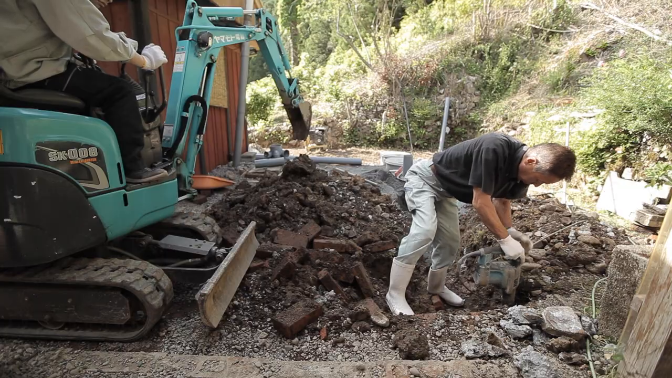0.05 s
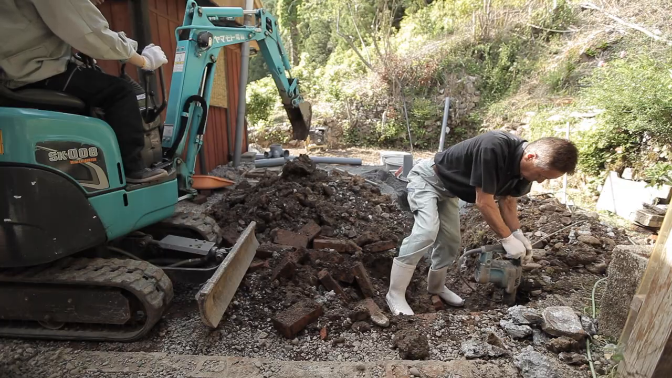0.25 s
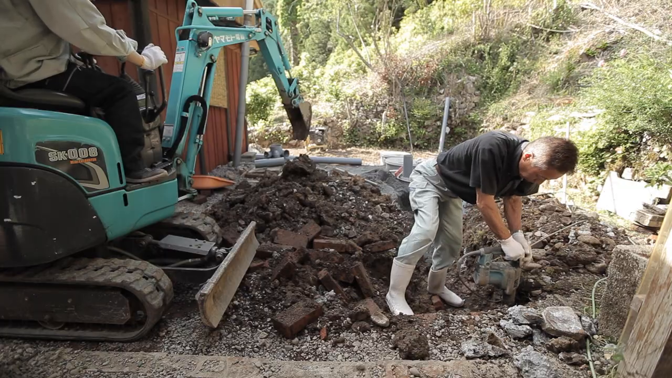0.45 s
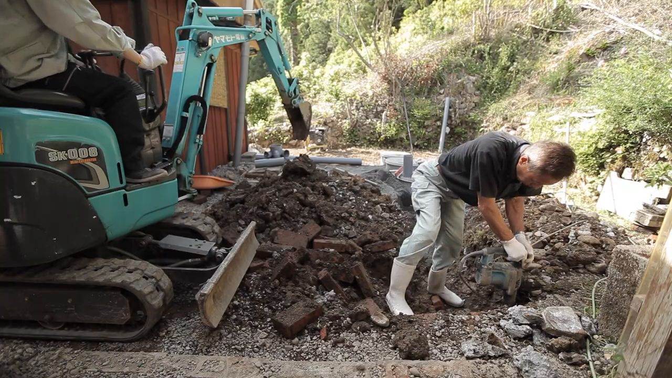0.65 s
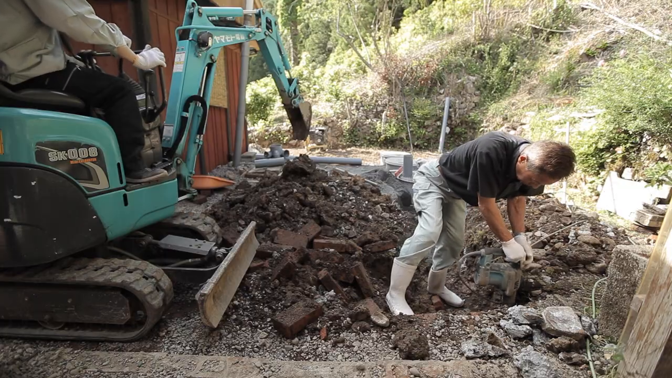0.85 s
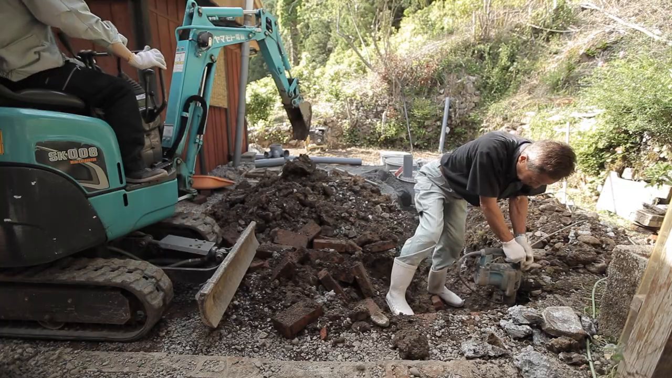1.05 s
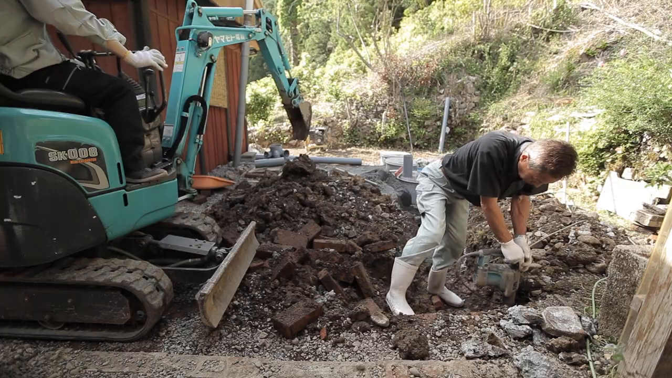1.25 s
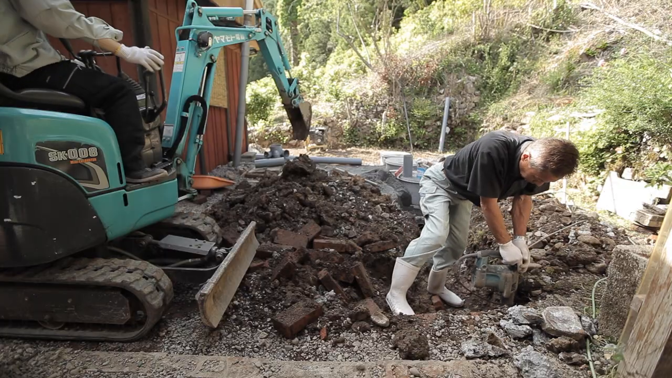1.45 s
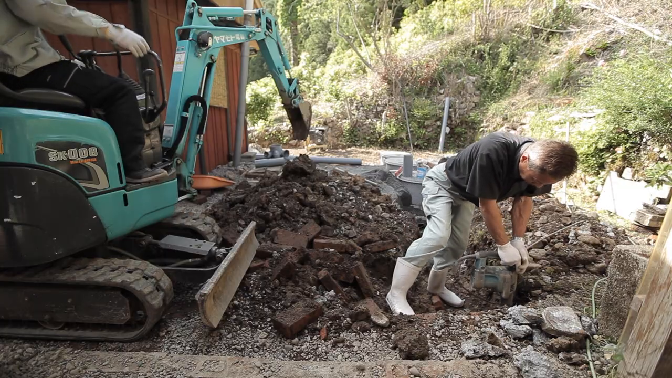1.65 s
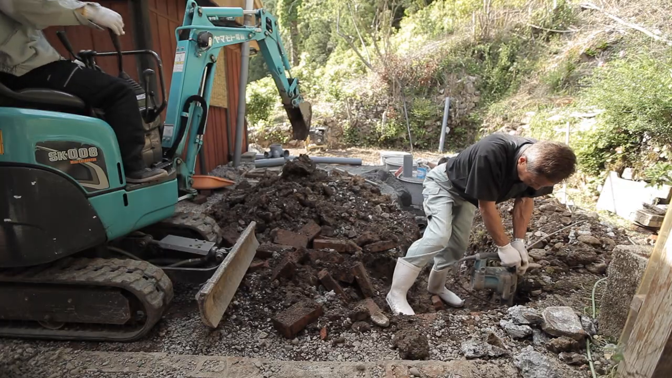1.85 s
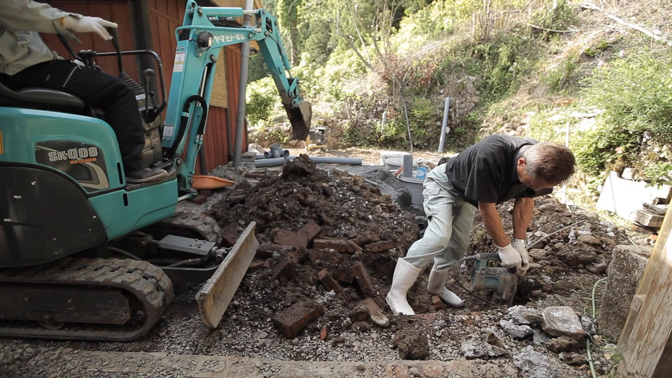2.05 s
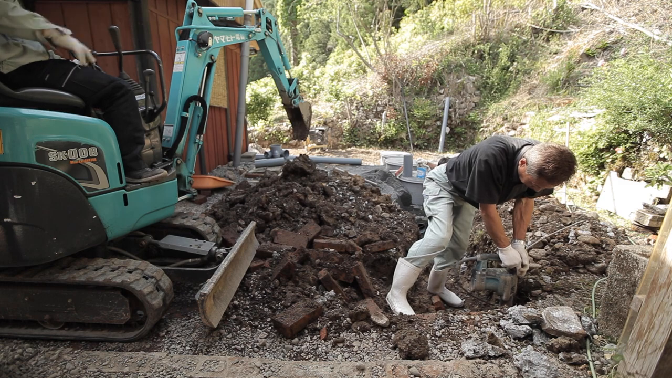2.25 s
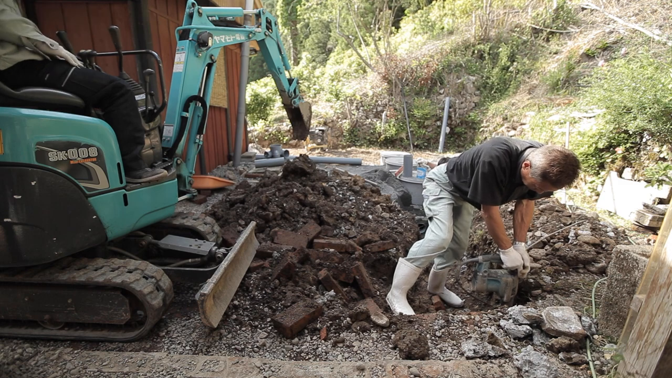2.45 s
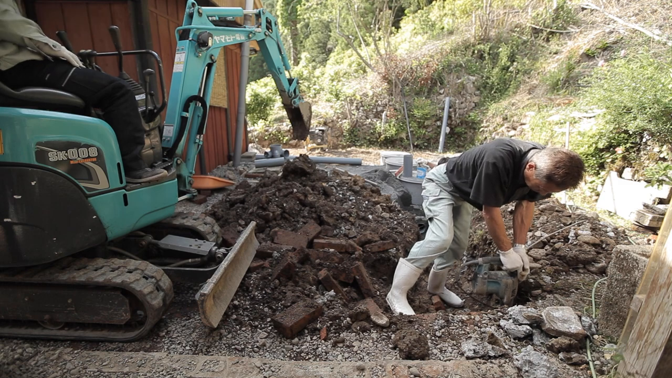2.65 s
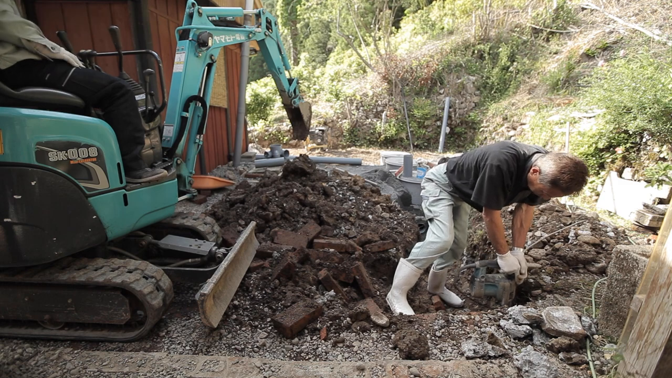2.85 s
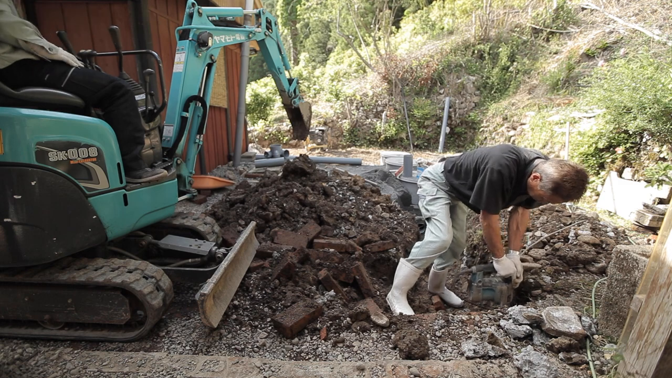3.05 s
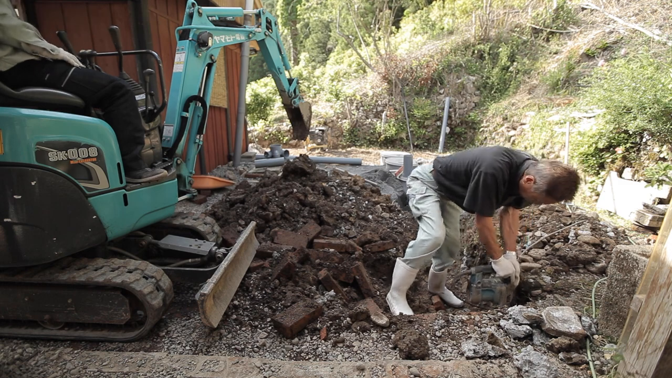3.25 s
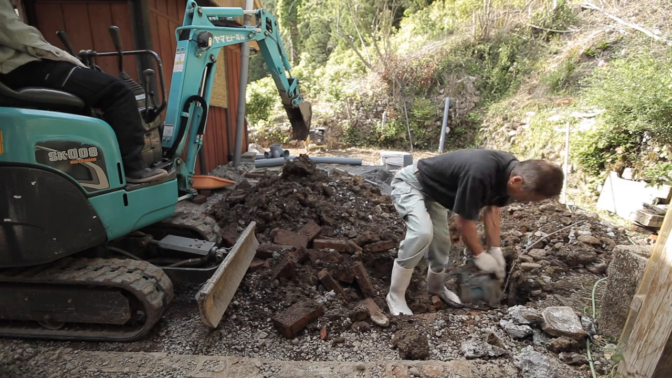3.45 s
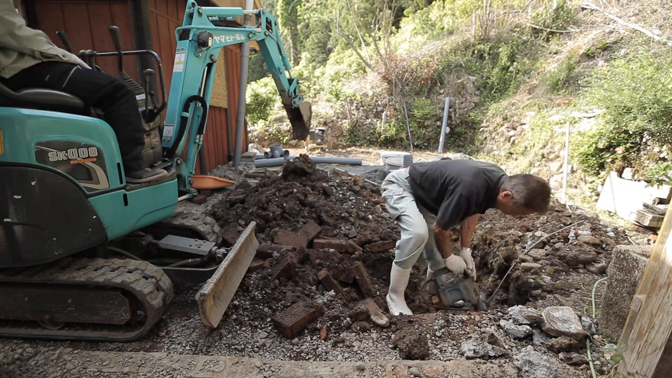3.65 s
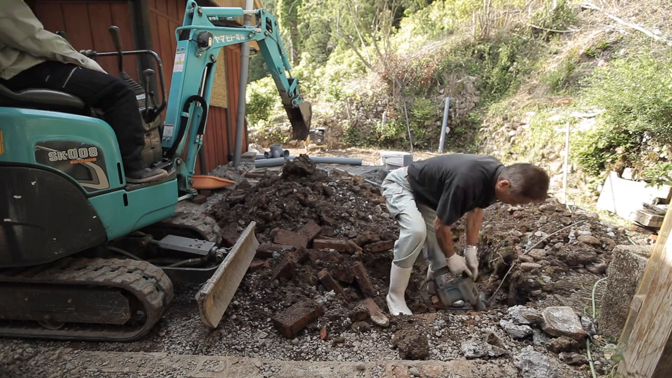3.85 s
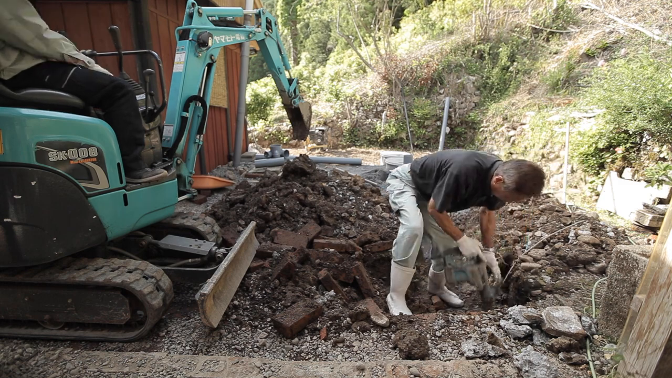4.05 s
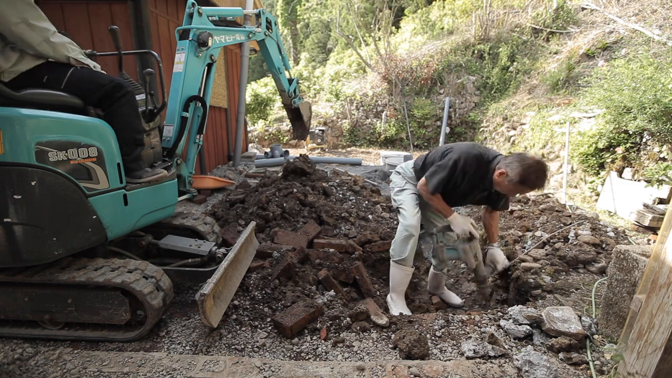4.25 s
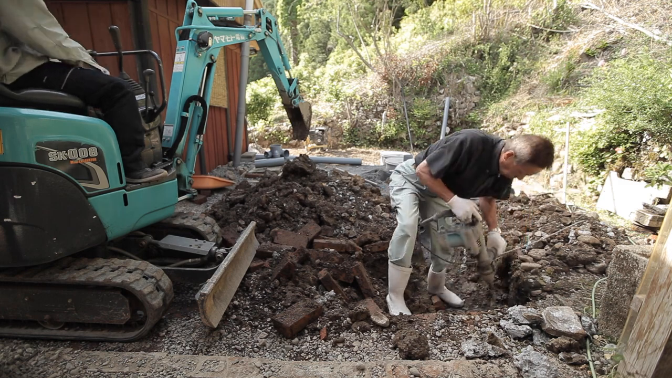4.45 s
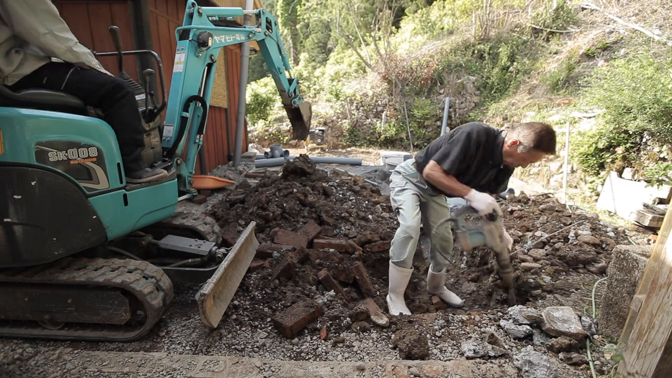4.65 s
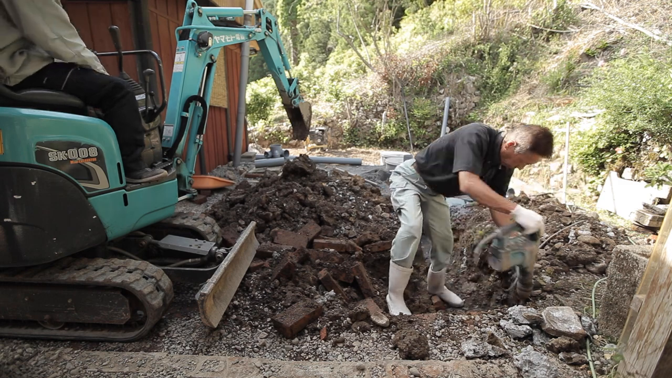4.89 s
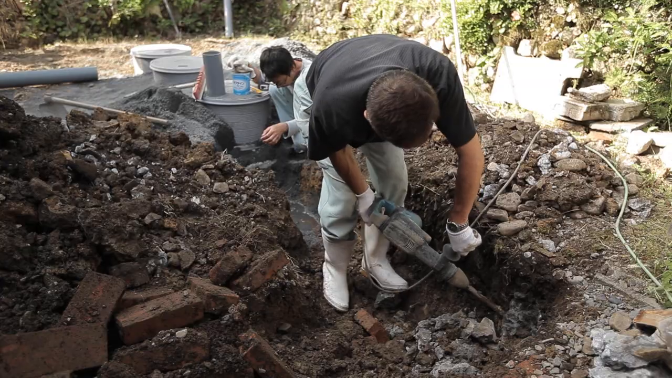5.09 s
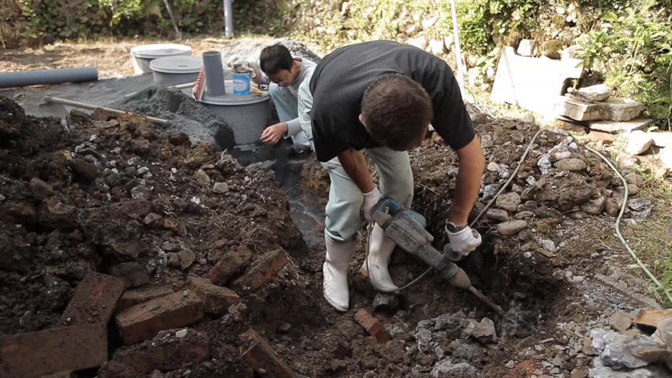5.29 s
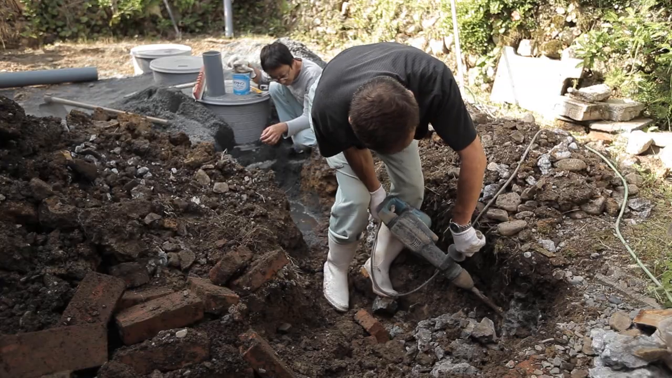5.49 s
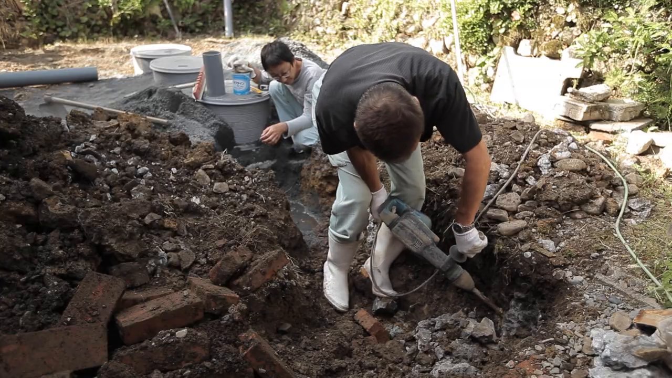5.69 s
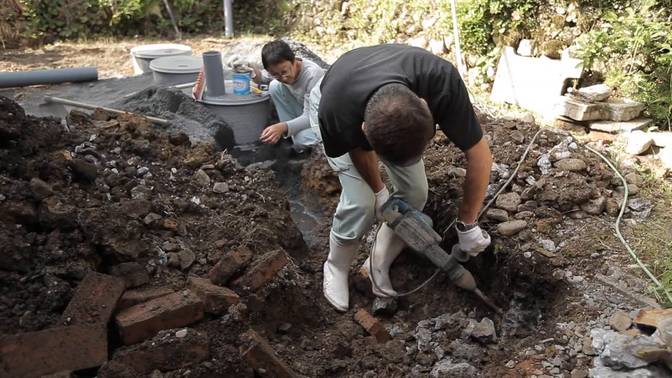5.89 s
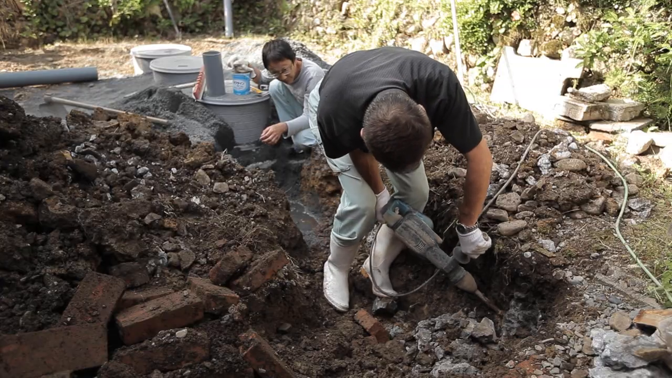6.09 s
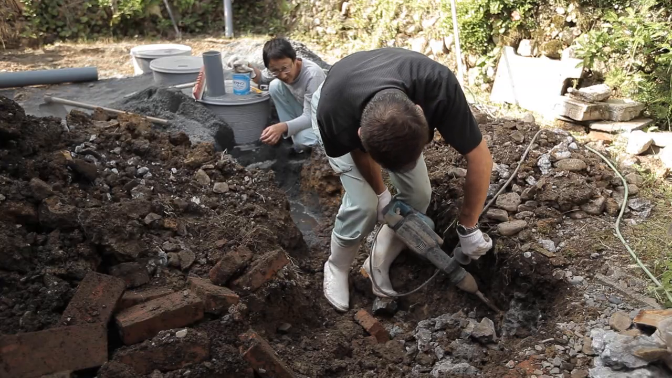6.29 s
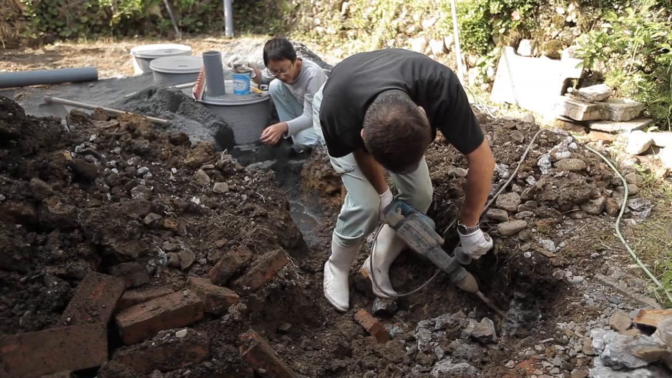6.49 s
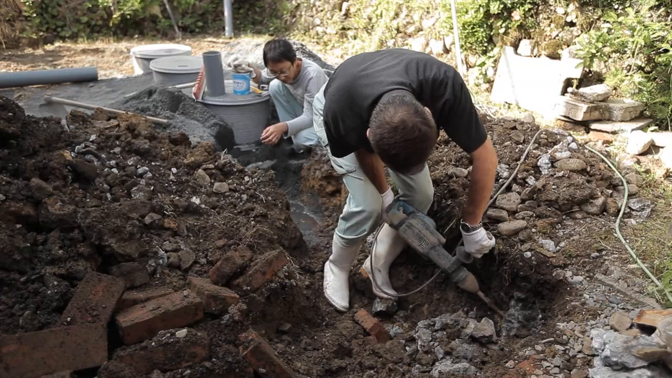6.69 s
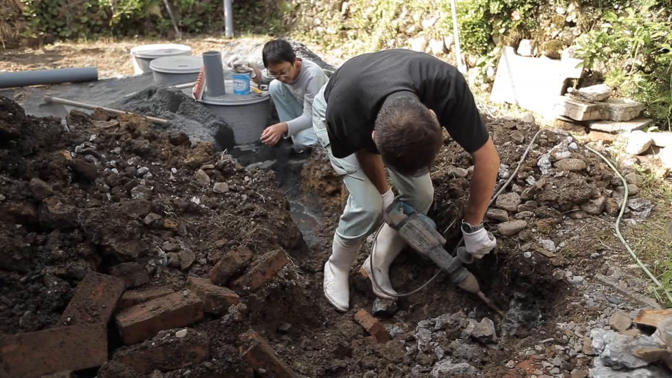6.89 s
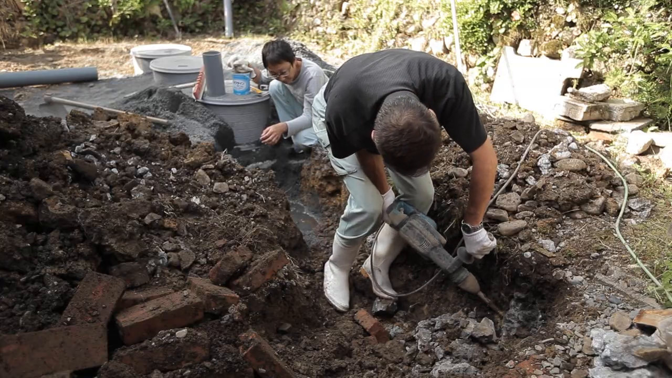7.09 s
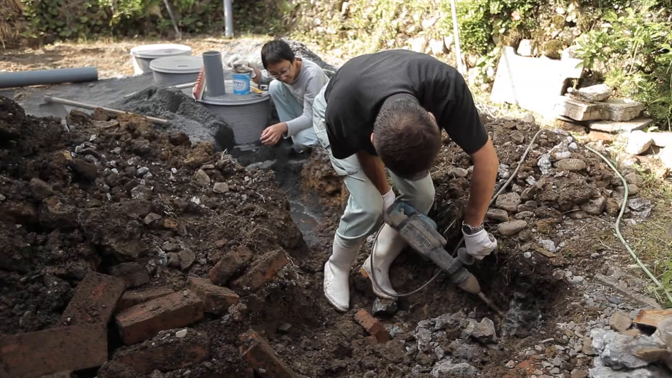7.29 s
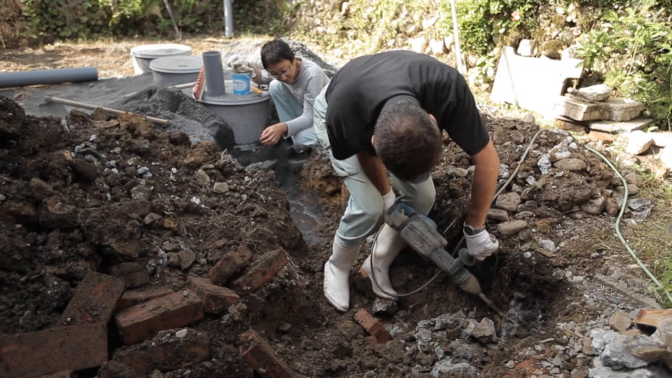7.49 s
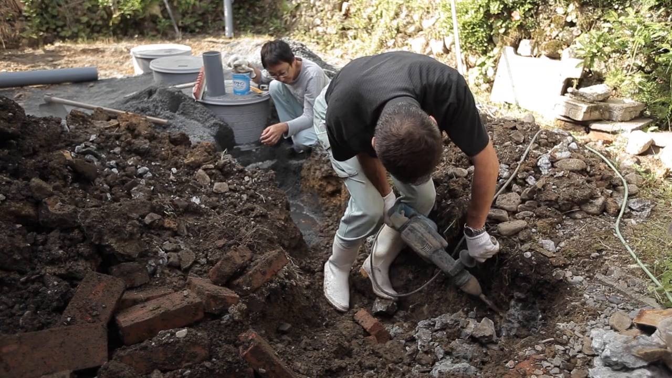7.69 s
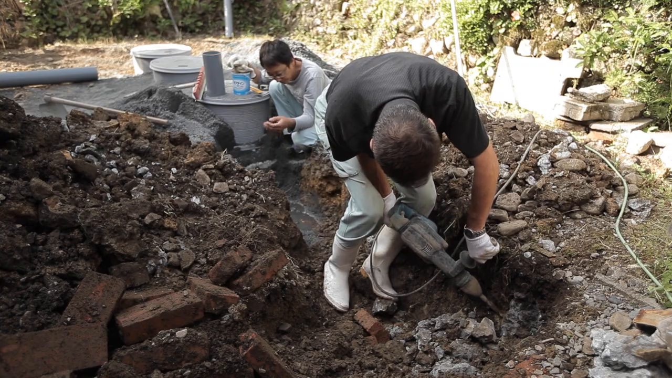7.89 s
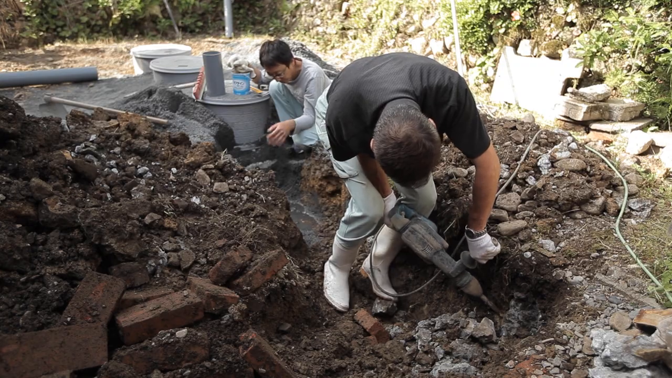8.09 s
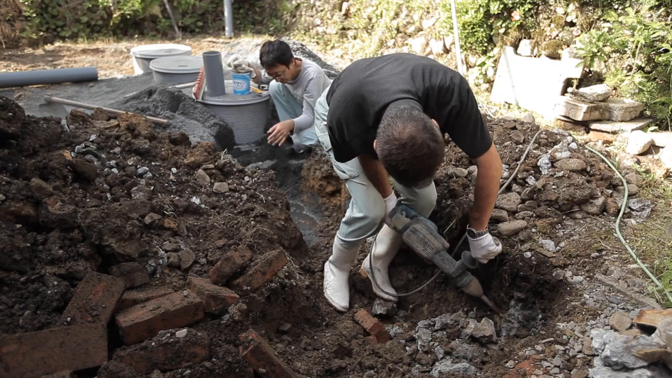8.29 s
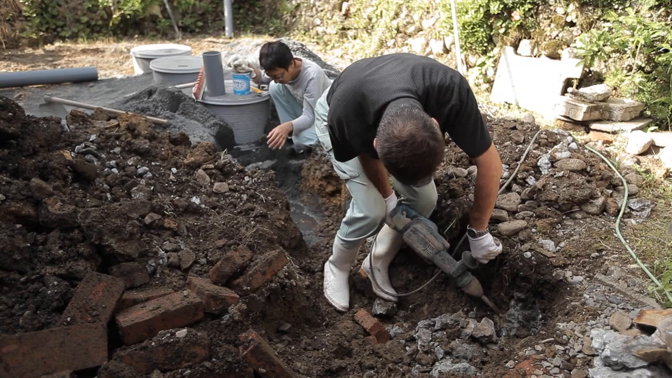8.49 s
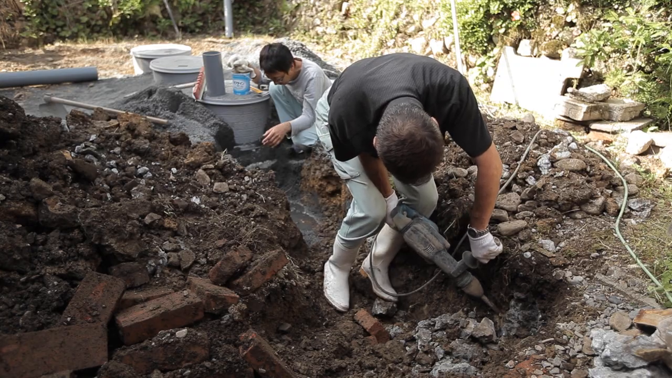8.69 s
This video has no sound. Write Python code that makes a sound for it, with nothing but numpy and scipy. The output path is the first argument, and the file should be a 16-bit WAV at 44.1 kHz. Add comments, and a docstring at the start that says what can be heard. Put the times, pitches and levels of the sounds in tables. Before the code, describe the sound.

An electric demolition hammer pounds packed, stony soil outdoors, heard from the side as very rapid thuds with cracking grit and a motor whine. It drops to a rattling idle for over a second, then jabs once. Now close in front, it taps lightly and resumes hammering on stone, brighter, with a ringing steel chisel. The blows overload the microphone and sound slightly distorted.

```python
"""Demolition hammer on stony ground

Outdoors, an electric hammer heard first from the side, then from close in front. On every crank turn
the gears whine as the piston compresses, then the blow lands: the ground thuds, grit cracks, the chisel
rings. In between, the tool is lifted and rattles idle. The blows overload the microphone, which clips."""
import sys
import numpy as np
from scipy import signal
from scipy.fft import rfft, irfft, next_fast_len
from scipy.io import wavfile

SR = 44100
rng = np.random.default_rng(int(sys.argv[2]) if len(sys.argv) > 2 else 0)


def wav_out(sig):
    """Save sig, one row per channel (or a flat mono array), as 16-bit PCM at SR to the path in sys.argv[1]."""
    wavfile.write(sys.argv[1], SR, np.round(np.clip(np.atleast_2d(sig).T, -1, 1) * 32767).astype(np.int16))


N = 385434
FRONT_FROM_S = 5.015  # the microphone position changes here

# The chisel is pressed into soil, jabbed once, then set on stone.
# Each row: start and end in seconds, load from 0 to 1, rattle in dB, ring over crack in dB.
PRESSES = [(-.1, 3.56, 0.69, -30.5, -4.5), (4.8, 5.0, 0.38, -25, 4.5), (5.331, 8.8, 1, -31.5, 2)]
# Spectrum of splitting stone. Each row: frequency in Hz, relative density in dB.
CRACK_SPECTRUM = [(80, -7), (250, -7), (600, 1), (1000, 1.5), (2400, 3.5), (4000, -1), (6000, 1.5),
                  (7800, -0.5), (9800, 1), (11000, -8), (15500, -7.5)]


def gain_of(db):
    """Decibels to a factor."""
    return 10 ** (np.asarray(db) / 20)


def unit_rms(x):
    """Scales to rms 1."""
    return x / np.sqrt(np.mean(x ** 2) + 1e-20)


def follow(rows, t):
    """The columns of a curve table at the times t."""
    times, *columns = np.transpose(rows)
    return [np.interp(t, times, column) for column in columns]


def add(mix, start_s, sound):
    """Mixes a sound in at start_s."""
    part = mix[max(round(start_s * SR), 0):][:len(sound)]
    part += sound[:len(part)]


def noise(spectrum, size, ripple_db=0):
    """Noise of rms 1 with the given spectrum, rippled by many small resonances."""
    n = next_fast_len(size)
    hz, db = np.transpose(spectrum)
    bins = np.fft.rfftfreq(n, 1 / SR)
    knots = np.geomspace(900, SR / 2, 150)
    ripple = ripple_db * np.interp(bins, knots, np.tanh(rng.standard_normal(len(knots))), left=0)
    shape_db = np.interp(np.log(bins + 1), np.log(hz), db) + ripple
    return unit_rms(irfft(rfft(rng.standard_normal(n)) * gain_of(shape_db), n)[:size])


def drift(t, per_s):
    """Random values, per_s of them a second, joined by lines."""
    knots = np.arange(0, N / SR + 1, 1 / per_s)
    return np.interp(t, knots, rng.standard_normal(len(knots)))


def per_turn(turns, spread_db):
    """A random gain that holds for one crank turn."""
    return gain_of(spread_db * rng.standard_normal(size=512))[turns.astype(int)]


def swell(turns, at, width):
    """A smooth bump once a turn; place and width in turns."""
    return np.exp((np.cos(2 * np.pi * (turns - at)) - 1) / (2 * np.pi * width) ** 2)


def burst(turns, rise, decay):
    """A sharp rise and a decay once a turn; both in turns."""
    since = turns % 1
    return unit_rms((1 - np.exp(-since / rise)) * np.exp(-since / decay))


def crank(t, speed, start):
    """Crank turns counted from start, very slightly uneven."""
    turns = start + np.cumsum(follow(speed, t)[0]) / SR
    return turns + 0.0015 * drift(t, per_s=40) + 0.003 * drift(t, per_s=7)


def contact(t, start, end, release_s, bite_s=0.056):
    """How firmly the chisel meets the ground, 0-1: a quick bite, a hold, a release."""
    return np.clip((t - start) / bite_s, 0, 1) * np.exp(-np.maximum(t - end, 0) / release_s)


def pressing(t, presses, ground):
    """Each press takes the load and the levels of thud, crack, ring and rattle from idle to work."""
    ground_db, stone_db = follow(ground, t)
    idle = 0.26, -56, -58, -63, -32
    idle_load, idle_thud, idle_crack, idle_ring, idle_rattle = idle
    load, thud_db, crack_db, ring_db, rattle_db = idle
    for start, end, full_load, clatter_db, steel_db in presses:
        firm = contact(t, start, end, release_s=0.018)
        jingle = contact(t, start, end, release_s=0.23)  # the freed chisel jingles on
        load += firm * (full_load - idle_load)
        thud_db += firm * (ground_db - idle_thud)
        crack_db += firm * (stone_db - idle_crack)
        rattle_db += firm * (clatter_db - idle_rattle)
        ring_db += jingle * (stone_db + steel_db - idle_ring)
    return np.clip(load, 0, 1), thud_db, crack_db, ring_db, rattle_db


def whine(t, turns, load, order, swing, at, width, back, kick, steady, flutter, overtone):
    """A tone of order cycles a turn that swells and rises on compression and is kicked by the blow."""
    slack = 1 - load  # near idle the tone wavers and the return stroke sounds too
    swung = turns + swing * load * np.sin(2 * np.pi * (turns - at - 0.08)) / (2 * np.pi)
    phase = 2 * np.pi * order * swung + flutter * drift(t, per_s=220)
    phase += slack ** 2 * (0.9 * drift(t, per_s=300) + 2.2 * drift(t, per_s=30))
    strokes = steady + swell(turns, at, width) + back * slack * swell(turns, at + 0.41, width)
    strokes += kick * load * swell(turns, at=0.078, width=0.04)
    strokes *= gain_of(4.5 * slack ** 2 * drift(t, per_s=14))
    tone = np.cos(phase) + overtone * load * np.cos(2 * phase)
    return unit_rms(strokes * per_turn(turns + 0.5, spread_db=0.86)) * tone


def motor(t, gears, fan):
    """Mixes both whines; the gears falter as the motor coasts and grow as the chisel is leaned on."""
    # Gear whine and fan whine. Each row: time in seconds, gain in dB.
    gear_gain = [(0, -28.5), (2, -30), (3, -31.5), (3.5, -32.5), (3.65, -38.5), (3.85, -34.5), (4, -43),
                 (4.15, -36.5), (4.65, -35), (4.85, -39), (4.98, -29), (5.03, -44), (5.3, -44),
                 (5.55, -33.5), (6.3, -30.5), (7.05, -29.5), (7.3, -30), (7.7, -28), (8.3, -27), (8.7, -28)]
    fan_gain = [(0, -37.5), (1.4, -35.5), (2.1, -33.5), (3.5, -31), (3.7, -36.5), (3.79, -41), (3.9, -35),
                (4.05, -44), (4.12, -33), (4.2, -38), (4.3, -32), (4.7, -31.5), (4.82, -37), (4.95, -35),
                (5.03, -40), (5.2, -33.5), (5.75, -31.5), (5.95, -39.5), (7.8, -37), (8.4, -34)]
    return gain_of(follow(gear_gain, t)[0]) * gears + gain_of(follow(fan_gain, t)[0]) * fan


def rattle(turns, load):
    """Piston and gear case clatter twice a turn; under load the clatter evens out towards a rush."""
    # Spectrum of the clatter. Each row: frequency in Hz, relative density in dB.
    spectrum = [(60, -48), (170, -48), (210, -8), (250, -17), (400, -9), (520, -0.5), (600, -0.5), (780, 3),
                (1500, 2), (2700, -3), (4000, -0.5), (5300, -2), (6500, -6.5), (9000, -8.5), (11000, -23),
                (15500, -27)]
    strokes = 1.24 + 0.66 * load + swell(turns, at=0.87, width=0.091)
    strokes += 1.6 * swell(turns, at=0.22, width=0.098)
    envelope = unit_rms(strokes * per_turn(turns + 0.5, spread_db=1))
    return envelope * noise(spectrum, len(turns), ripple_db=4.5)


def chisel(times, size, strengths):
    """Every blow rings the steel; the changing grip of the ground detunes and favours single modes."""
    # Modes of the steel. Each row: frequency in Hz, relative level in dB, seconds to fall 60 dB.
    modes = [(5505, -5.5, 0.03), (5650, -2, 0.028), (5830, -8, 0.026), (7540, -24, 0.041),
             (8640, -3, 0.044), (8700, 1, 0.036), (8940, 1, 0.037), (9400, -4, 0.033), (9860, -11.5, 0.073),
             (12430, 0.5, 0.021), (12100, -9, 0.03)]
    hz, db, t60 = np.transpose(modes)[:, :, None]
    t, out = np.arange(SR // 32) / SR, np.zeros(size)
    grips_db = 2.8 * np.transpose([drift(times, per_s=5) for _ in modes])
    chance = rng.standard_normal((len(times), 3, len(modes), 1))
    dying = gain_of(db - 60 * t / t60) * (1 - np.exp(-t / 0.00026))
    bends = 1 + 0.005 * drift(times, per_s=6)
    scatter_hz = 3 / t60  # the modes damped most by the ground are also detuned most
    for start, strength, grip, bend, draws in zip(times, strengths, grips_db, bends, chance):
        detune, accent, phase = draws
        waves = np.sin(2 * np.pi * (hz * bend + scatter_hz * detune) * t + 1.13 * phase)
        gains = gain_of(grip[:, None] + 3.1 * accent)
        add(out, start, strength * (gains * dying * waves).sum(0))
    return out


def ring(t, turns):
    """The chisel is struck once a turn and rebounds against its holder a moment later."""
    times = t[1:][np.diff(np.floor(turns)) > 0] - t[0]
    rebound_s = 0.0048 + 0.0012 * rng.standard_normal(len(times))
    full = np.ones(len(times))
    return unit_rms(chisel(times, len(t), full) + chisel(times + rebound_s, len(t), 0.49 * full))


def cushioned(x, ring_db, top_hz, soft_db=-38, span_db=8):
    """Soil softens the blow, so the highest modes of the steel sound only when it rings hard on stone."""
    soft = signal.sosfiltfilt(signal.butter(4, top_hz, fs=SR, output="sos"), x)
    return soft + np.clip((ring_db - soft_db) / span_db, 0, 1) * (x - soft)


def stray_blows():
    """Single light blows while the chisel barely touches: a ring and a short snap."""
    # Each row: start of a blow in seconds, relative strength in dB.
    blows = [(5.029, -31), (5.0769, -30), (5.1253, -24), (5.1504, -20), (5.224, -28), (5.296, -25),
             (5.3405, -17)]
    times, db = np.transpose(blows)
    out = gain_of(-9) * chisel(times, N, gain_of(db))
    t = np.arange(SR // 50) / SR
    for start, strength in zip(times, gain_of(db)):
        add(out, start, 0.29 * strength * np.exp(-t / 0.0017) * noise(CRACK_SPECTRUM, len(t)))
    return out


def crack(turns, decay, crumble):
    """Stone splits at the blow; then grit crumbles in clumps as the tip sinks in."""
    split = burst(turns, rise=0.0083, decay=decay) * per_turn(turns, spread_db=1.4)
    sinking = crumble * swell(turns, at=0.13, width=0.19) * per_turn(turns, spread_db=3.5)
    clumps = gain_of(drift(np.arange(len(turns)) / SR, per_s=900))
    return unit_rms((split + sinking) * clumps) * noise(CRACK_SPECTRUM, len(turns), ripple_db=4)


def thud(turns, load, bodies, lag, rough, low_hz):
    """Each blow is a push and a crunch into the bodies' low resonances, rougher on a loose chisel."""
    blow_count = np.floor(turns - lag)
    push = np.diff(blow_count, prepend=blow_count[0]) * per_turn(turns + 0.5, spread_db=0.5)
    crunch = rng.standard_normal(len(turns)) * burst(turns, rise=0.026, decay=0.37)
    crunch_share = np.clip(rough + 0.52 * (1 - load), 0, 1)
    drive = np.sqrt(1 - crunch_share ** 2) * unit_rms(push) + crunch_share * crunch
    t, response = np.arange(SR // 12) / SR, 0
    for delay_s, modes in bodies:
        age = np.maximum(t - delay_s, 0)
        for hz, width, db in modes:
            response += gain_of(db) * width * np.exp(-np.pi * width * age) * np.sin(2 * np.pi * hz * age)
    band = signal.butter(2, [low_hz, 1100], "band", fs=SR, output="sos")
    return unit_rms(signal.sosfilt(band, signal.oaconvolve(drive, response)[:len(turns)]))


def band_gain(x, db, band_hz):
    """Raises or lowers one band by a changing number of dB."""
    band = signal.butter(2, band_hz, "band", fs=SR, output="sos")
    return x + (gain_of(db) - 1) * signal.sosfiltfilt(band, x)


def glancing(x, load, firm_load=0.73, loose_load=0.52, clank_hz=1000):
    """A lightly pressed chisel does not move the soil: the thud loses its bass and becomes a clank."""
    loose = 0.85 * np.clip((firm_load - load) / (firm_load - loose_load), 0, 1)
    clank = unit_rms(signal.sosfilt(signal.butter(2, clank_hz, "high", fs=SR, output="sos"), x))
    return (1 - loose) * x + loose * clank


def ground_echo(x, delay_s, share):
    """The sound reaches the microphone directly and once more off the ground."""
    index = np.arange(len(x))
    return unit_rms(x + share * np.interp(index - delay_s * SR, index, x))


def hammer_from_side():
    """Side on, in packed soil: the body knocks, the ground thuds just after; then idling and one jab."""
    # Crank speed. Each row: time in seconds, turns a second.
    speed = [(0, 44.31), (.5, 44.12), (3.5, 44.16), (3.62, 45.7), (3.8, 43.6), (3.97, 40.4), (4.15, 41.6),
             (5.015, 41.2)]
    # How hard the blows land. Each row: time in seconds, ground thud in dB, stone crack in dB.
    ground = [(0, -26, -25.5), (.3, -25.5, -29), (.55, -29, -30.5), (1.25, -25, -33), (2.199, -26, -35),
              (2.5, -25, -44), (2.77, -28, -43), (2.848, -34.5, -30.5), (3.06, -35, -38), (3.17, -34, -36),
              (3.45, -30.5, -30.5), (3.56, -41, -36), (4.86, -31, -31), (4.98, -14, -31)]
    # Resonances of the tool body, knocked by the striker, and of the soil.
    # Each row: frequency in Hz, width in Hz, relative level in dB.
    body_modes = [(385, 57.6, 5), (617.4, 25, -4), (700, 17, -2), (966, 14, -18)]
    soil_modes = [(204, 26, -4.5), (413.2, 19, 0.5), (515, 78, -7), (659, 9.2, -3.5), (754, 63, -7.5),
                  (870, 19, -32)]
    # Lift of the pounding around 750 Hz. Each row: time in seconds, gain in dB.
    mid_lift = [(0, 1.5), (.55, 4), (1.3, 5.5), (1.6, 4), (2, 6.5), (2.35, 3.5), (2.9, 4), (3.2, 9),
                (3.5, 3.5), (4.85, -8)]
    t = np.arange(round(FRONT_FROM_S * SR)) / SR
    turns = crank(t, speed, start=0.9)
    load, thud_db, crack_db, ring_db, rattle_db = pressing(t, PRESSES[:2], ground)
    bodies = [(0, body_modes), (0.00435, soil_modes)]
    pounding = thud(turns, load, bodies, lag=0.039, rough=0.074, low_hz=134)
    pounding = band_gain(pounding, follow(mid_lift, t)[0], band_hz=[627, 950])
    hammering = (gain_of(thud_db) * glancing(pounding, load)
                 + gain_of(crack_db) * crack(turns, decay=0.51, crumble=0.63)
                 + gain_of(ring_db) * cushioned(ring(t, turns), ring_db, top_hz=10400)
                 + gain_of(rattle_db) * rattle(turns, load))
    gears = whine(t, turns, load, order=41, swing=0.097, at=0.803, width=0.079,
                  back=0.43, kick=0.85, steady=0.14, flutter=0.19, overtone=0.11)
    fan = whine(t, turns, load, order=82, swing=0.016, at=0.8, width=0.094,
                back=0.9, kick=0.11, steady=0.18, flutter=0.15, overtone=0.44)
    return hammering + motor(t, gears, fan)


def hammer_from_front():
    """Close in front, chisel foremost: the hammer is set down again and driven on stone."""
    # Crank speed. Each row: time in seconds, turns a second.
    speed = [(5.015, 41.7), (5.3, 41.38), (5.44, 40.55), (5.6, 41.3), (6.26, 41.16), (6.51, 45.1),
             (6.7, 44.29), (7.2, 43.83), (7.34, 44.6), (7.6, 44.02), (8.25, 44.26), (8.45, 43.35)]
    # How hard the blows land. Each row: time in seconds, ground thud in dB, stone crack in dB.
    ground = [(5.38, -49, -24), (5.5, -44, -29), (5.6, -40, -24), (5.72, -41, -23), (5.8, -45, -31),
              (5.95, -42, -25), (6.501, -35, -25), (6.9, -35, -27), (7.12, -35.5, -24), (7.5, -36.5, -25.5),
              (8.25, -36, -25.5), (8.42, -33.5, -21.5), (8.7, -33, -23)]
    # Resonances of the ground. Each row: frequency in Hz, width in Hz, relative level in dB.
    ground_modes = [(136.2, 11, -6), (297, 40, 2.5), (361, 37, -7), (607, 61, -2), (805, 81, 3.5),
                    (1005, 78, -7)]
    t = np.arange(round(FRONT_FROM_S * SR), N) / SR
    turns = crank(t, speed, start=0.315)
    load, thud_db, crack_db, ring_db, rattle_db = pressing(t, PRESSES[2:], ground)
    wedged_db = 7.5 * np.exp(-((t - 7.97) / 0.6) ** 2)  # the stone grips the chisel and damps its ring
    pounding = thud(turns, load, [(0.00079, ground_modes)], lag=0.038, rough=0.18, low_hz=135)
    hammering = (gain_of(thud_db) * ground_echo(pounding, delay_s=0.00807, share=0.39)
                 + gain_of(crack_db) * crack(turns, decay=0.45, crumble=0.57)
                 + gain_of(ring_db - wedged_db) * ring(t, turns)
                 + gain_of(rattle_db) * rattle(turns, load))
    gears = whine(t, turns, load, order=41, swing=0.02, at=0.915, width=0.082,
                  back=0.4, kick=0.079, steady=0.14, flutter=0.22, overtone=0.062)
    fan = whine(t, turns, load, order=82, swing=0.01, at=0.84, width=0.061,
                back=0.98, kick=0.1, steady=0.27, flutter=0.11, overtone=0.08)
    return hammering + motor(t, gears, fan)


def scene():
    """One microphone position after the other, in mono."""
    return (np.concatenate([hammer_from_side(), hammer_from_front()]) + stray_blows())[None]


def record(dry):
    """The overloaded microphone input clips with a firm knee; then the top treble is cut off."""
    ceiling, edge_hz = 0.095, 15740
    oversampled = signal.resample_poly(dry, 2, 1, axis=1)
    clipped = oversampled / (1 + (oversampled / ceiling) ** 8) ** (1 / 8)
    low_pass = signal.firwin(511, edge_hz, window=("kaiser", 9), fs=SR)
    return signal.oaconvolve(signal.resample_poly(clipped, 1, 2, axis=1), low_pass[None], "same")


dry = scene()
out = record(dry)
wav_out(out)
```